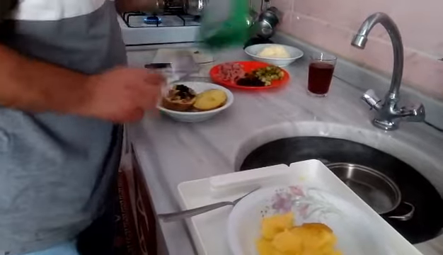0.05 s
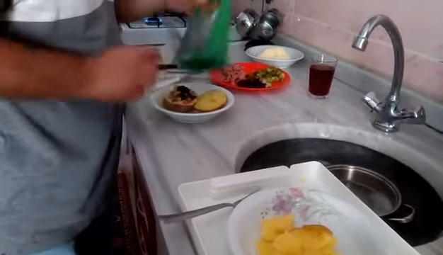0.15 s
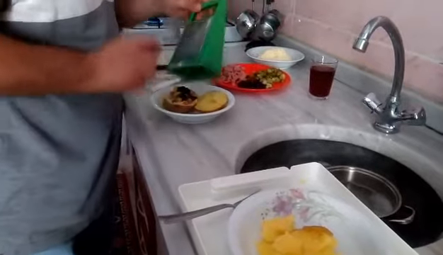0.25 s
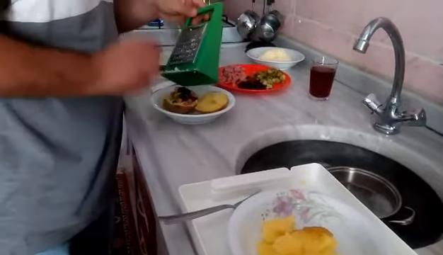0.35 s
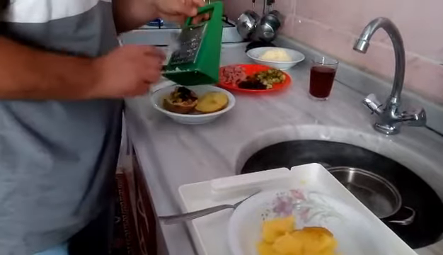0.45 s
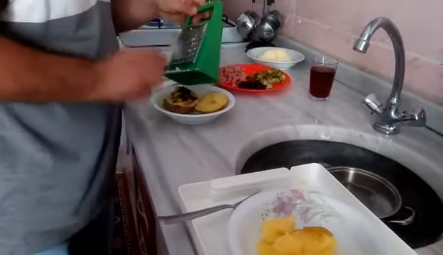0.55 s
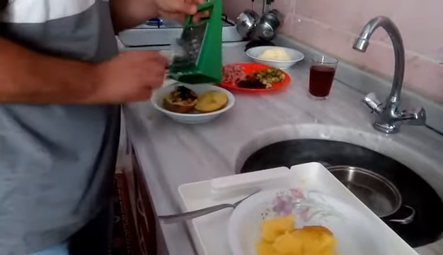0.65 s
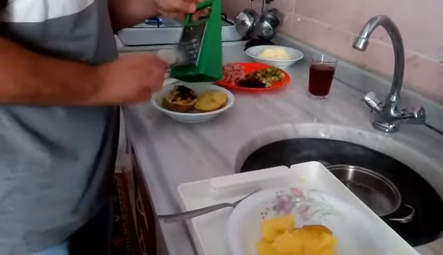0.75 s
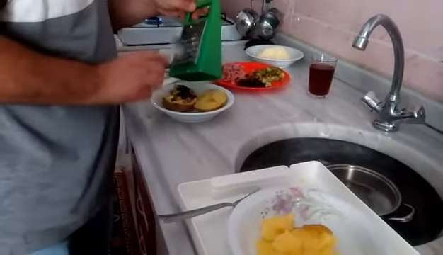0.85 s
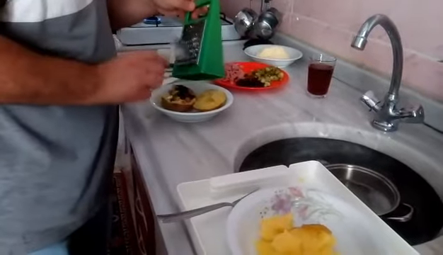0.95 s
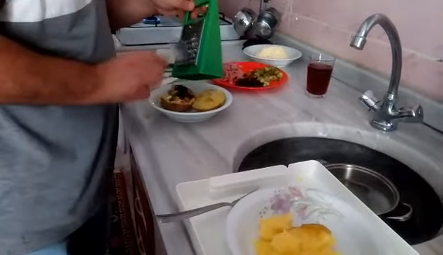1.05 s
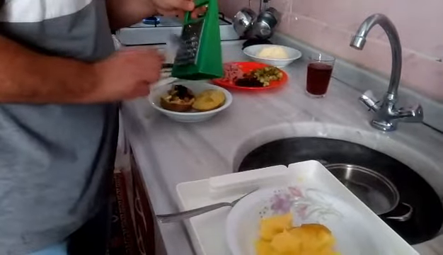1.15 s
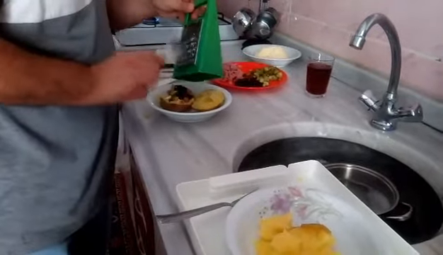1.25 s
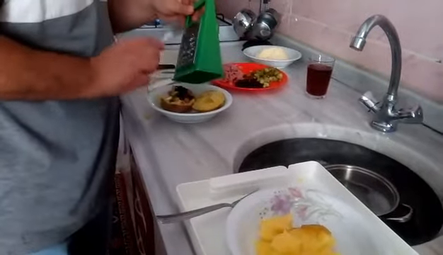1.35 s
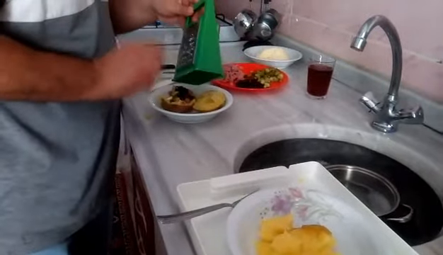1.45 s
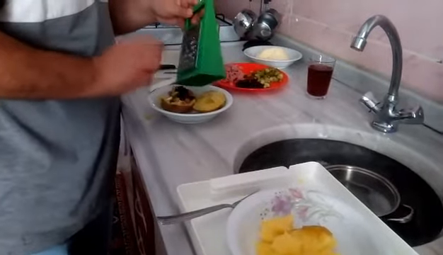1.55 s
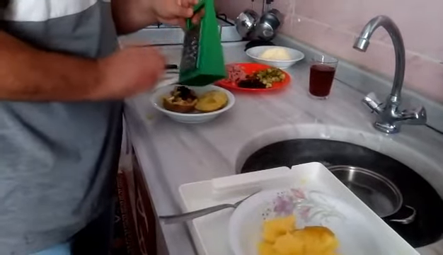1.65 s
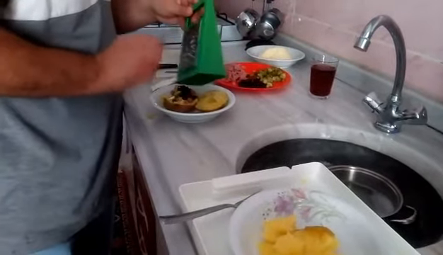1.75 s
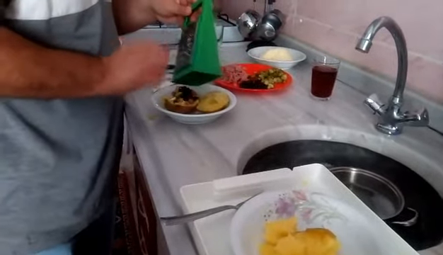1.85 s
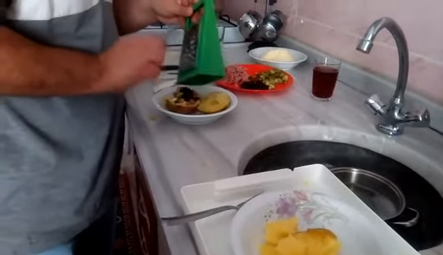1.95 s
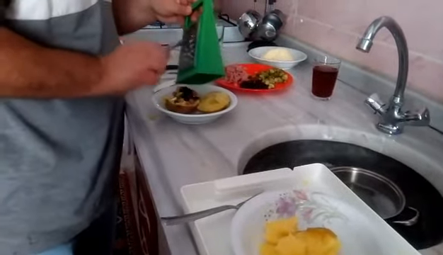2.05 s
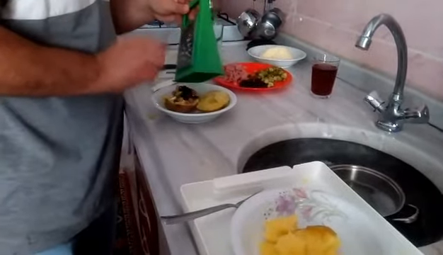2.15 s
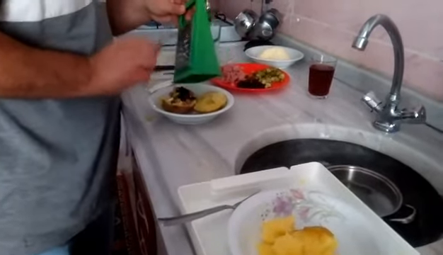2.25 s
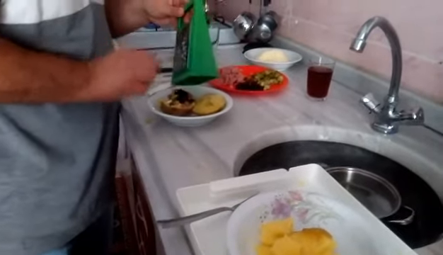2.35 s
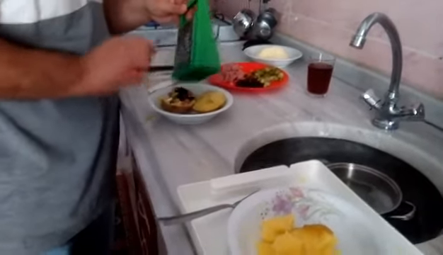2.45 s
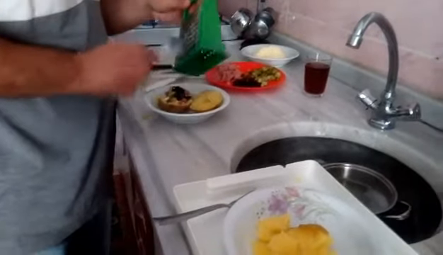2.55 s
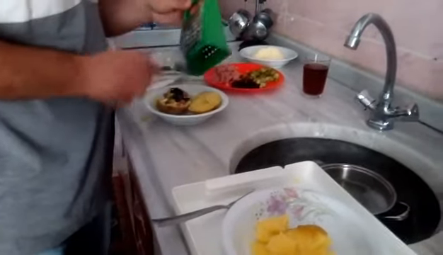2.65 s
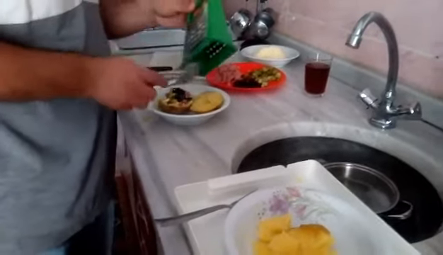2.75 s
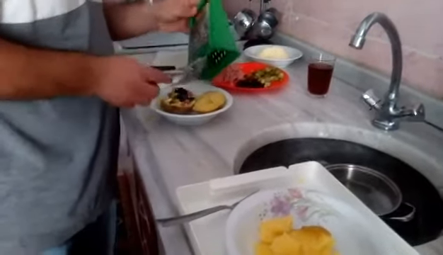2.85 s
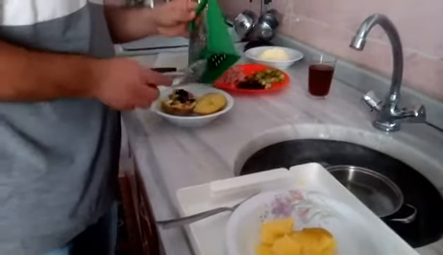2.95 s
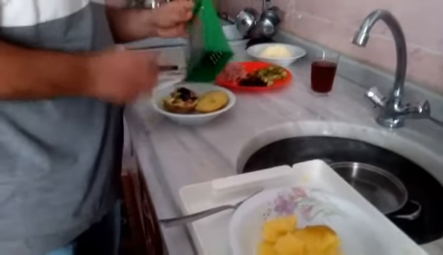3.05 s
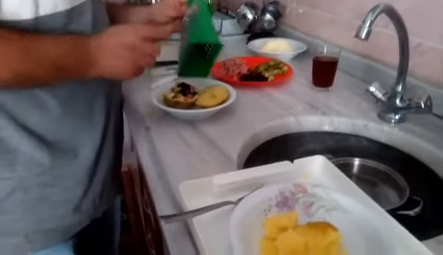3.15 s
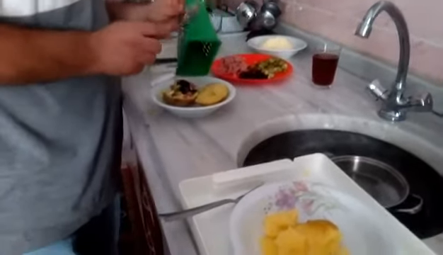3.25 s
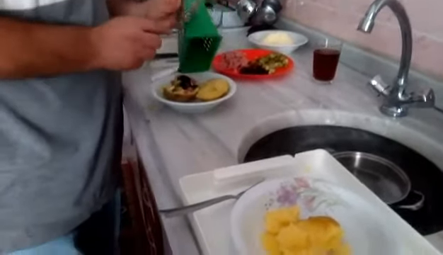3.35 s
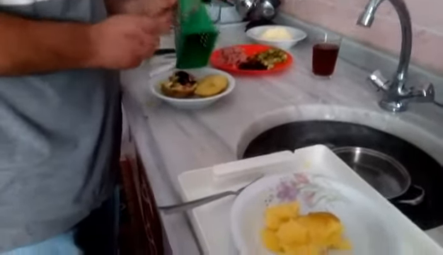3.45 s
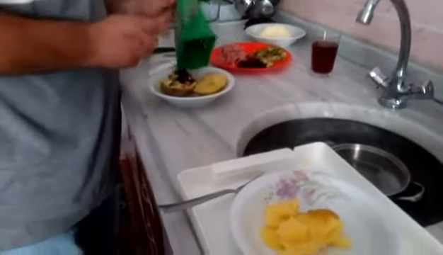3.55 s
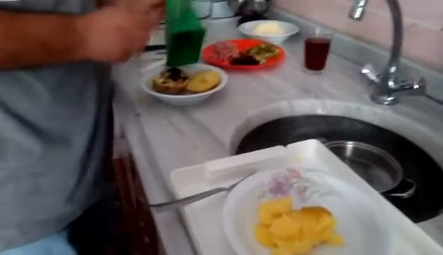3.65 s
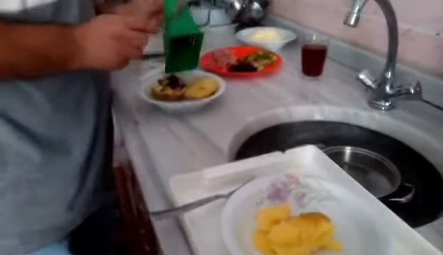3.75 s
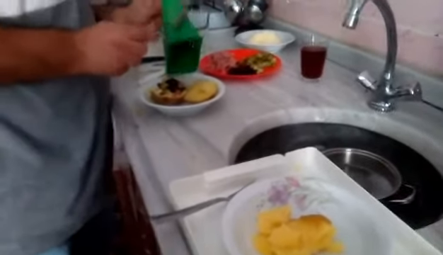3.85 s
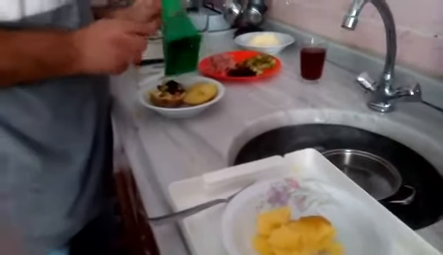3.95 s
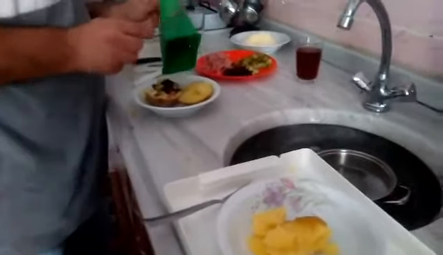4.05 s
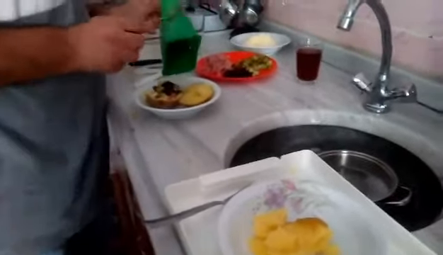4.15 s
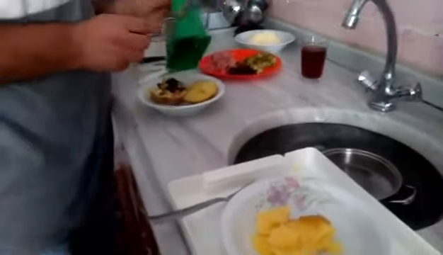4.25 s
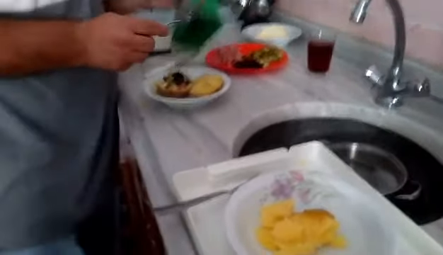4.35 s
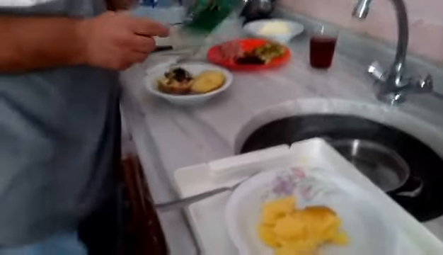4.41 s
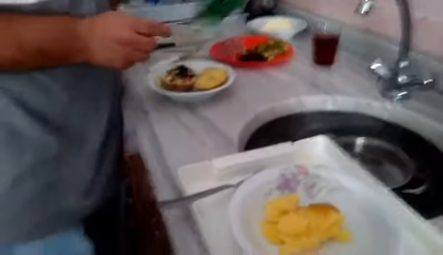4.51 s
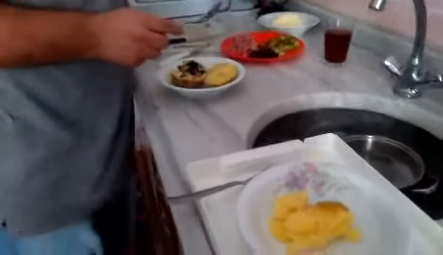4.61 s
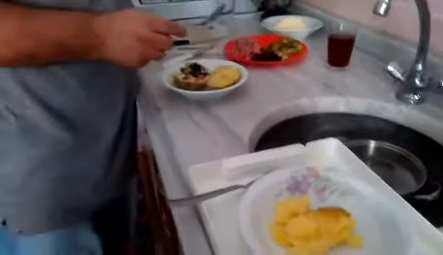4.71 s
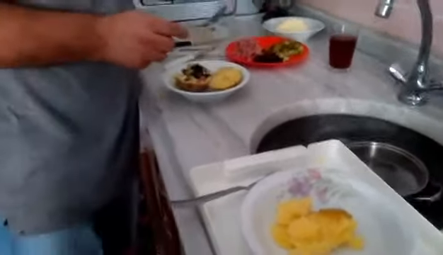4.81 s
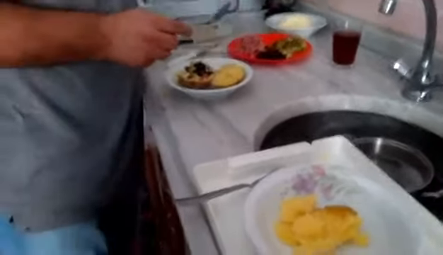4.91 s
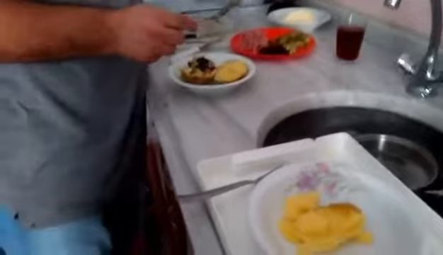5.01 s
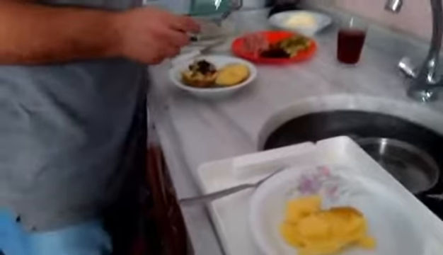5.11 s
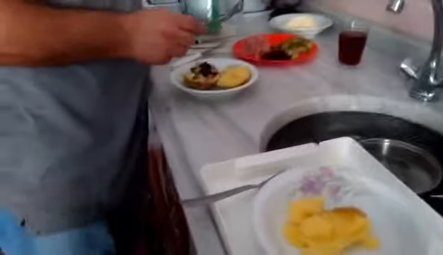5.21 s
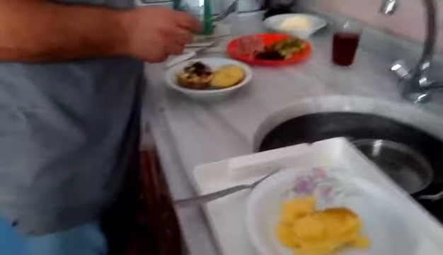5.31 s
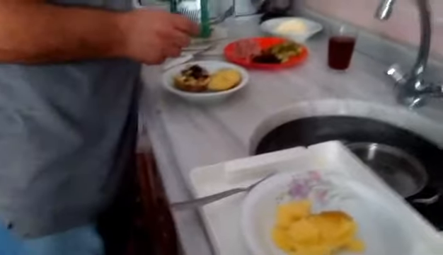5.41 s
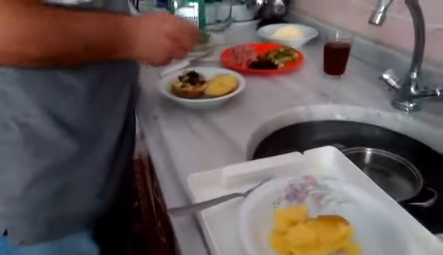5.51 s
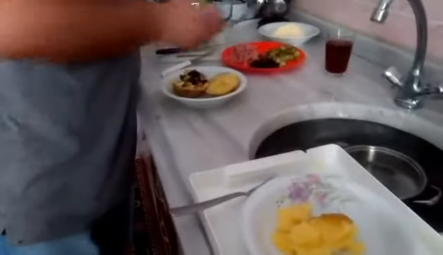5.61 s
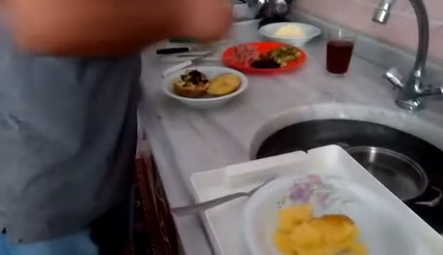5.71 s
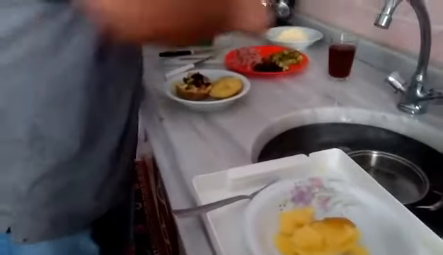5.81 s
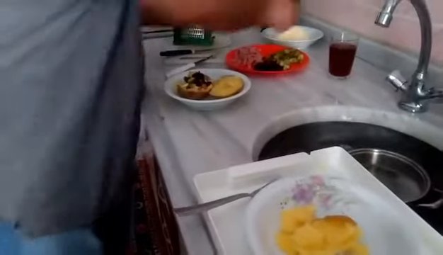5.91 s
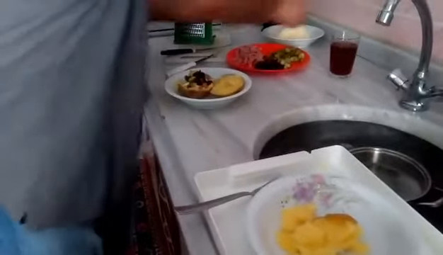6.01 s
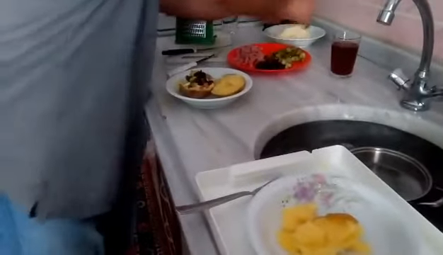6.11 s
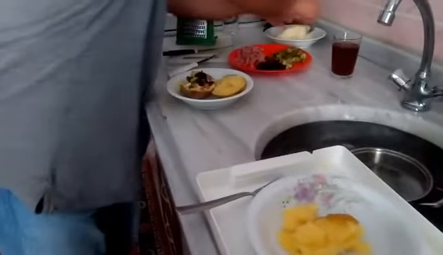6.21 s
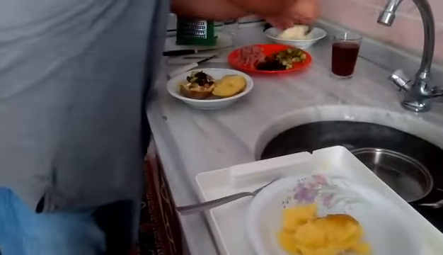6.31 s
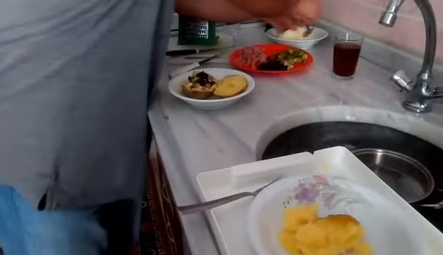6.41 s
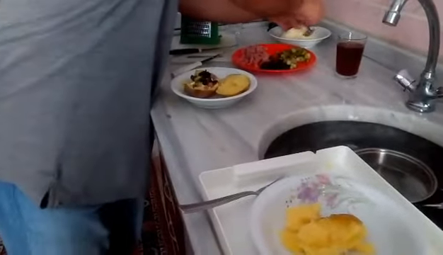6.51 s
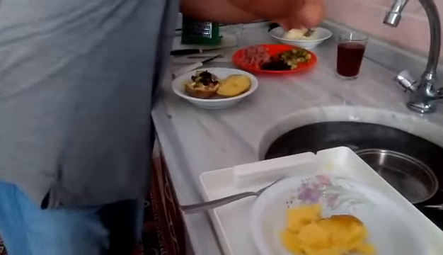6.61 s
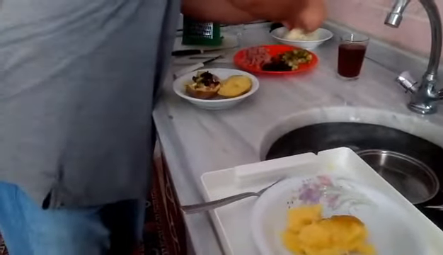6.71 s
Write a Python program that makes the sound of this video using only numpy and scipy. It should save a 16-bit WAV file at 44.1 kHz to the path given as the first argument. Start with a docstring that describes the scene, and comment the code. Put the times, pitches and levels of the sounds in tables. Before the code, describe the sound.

A knife taps a steel box grater with a plastic frame, close to the microphone in a small tiled kitchen. Two quick runs of six taps come almost back to back; after a pause of about a second, four louder taps follow. Each is a bright, hollow metallic clash with a short ring off the tiles. A few faint knocks and a clink come afterwards, while a refrigerator hums quietly behind.

```python
"""A box grater, steel sheets in a plastic frame, is tapped with a knife to shake the cheese off.
One microphone, close by in a small tiled kitchen, hears three quick runs of taps. Each blow sets off
a short clash, rings the sheets, hollow box, blade and frame, and comes back off the tiles.
A few light touches, knocks and clinks fall around the runs; a refrigerator hums behind."""
import sys
import numpy as np
from scipy import signal
from scipy.fft import rfft, irfft
from scipy.io import wavfile
from scipy.ndimage import uniform_filter1d, minimum_filter1d

SR = 44100
rng = np.random.default_rng(int(sys.argv[2]) if len(sys.argv) > 2 else 0)


def waveform_to_disk(signal):
    """Save audio, clipped to [-1, 1], as 16-bit WAV at the path in sys.argv[1]."""
    frames = np.transpose(np.atleast_2d(signal))
    scaled = np.clip(frames, -1, 1) * 32767
    samples = np.round(scaled).astype(np.int16)
    wavfile.write(sys.argv[1], SR, samples)


N = 298557
AGE = np.arange(int(.7 * SR)) / SR   # seconds since a blow


def grater_taps():
    """Knife on grater, close up: a dense clash, clearer modes and the room all grow with the force."""
    # Each row: start in seconds, force in dB, ring of the sheets in dB relative to the force.
    blows = [(0.461, -12.5, -13), (0.618, -14.5, -10.5), (0.773, -12, -9), (0.928, -8.5, -9),
             (1.084, -14, -12.5), (1.246, -11, -11.5), (1.528, -9.5, -12), (1.691, -10, -10),
             (1.91, -11.5, -22), (2.079, -11, -38), (2.23, -11, -9.5), (2.387, -10.5, -10.5),
             (3.408, -42, -1), (3.543, -8, -7.5), (3.723, -7.5, -6), (3.879, -9.5, -4), (4.045, -7.5, -4),
             (5.365, -37, -5), (5.383, -32, -15)]
    # The crowd of short-lived modes in a clash. Each row: frequency in Hz, relative density in dB.
    clash_colour = [(50, -75), (110, -40), (180, -17.5), (300, -24), (540, -13), (850, -14), (1100, -4.5),
                    (2100, -9.5), (2500, -3), (3400, -4), (4300, 0), (6300, 1.5), (7100, -4), (8300, -17),
                    (13500, -26), (15200, -20.5)]
    alike, body_send_db = 0.24, -9.5   # the clear modes reach the room more weakly than the clash
    out = np.zeros(N)
    common = noise(clash_colour, len(AGE))   # the share of the clash that is alike in every tap
    contact = 1 - np.exp(-AGE / 0.00073)   # rise of a blow
    for s, force_db, sheet_db in blows:
        hollow_db, blade_hz, blade_db, zing_hz, zing_db, frame_hz, room_db = grip_at(s)
        crowd = np.sqrt(alike) * common + np.sqrt(1 - alike) * noise(clash_colour, len(AGE))
        zing = from_db(zing_db) * cluster(zing_hz, spread=0.094, t60=0.04, count=24)
        clash = from_db(force_db) * (soften(crowd, force_db) * fade(t60=0.071) + zing)
        sheets = from_db(sheet_db) * steel_sheets()
        blade = from_db(blade_db) * cluster(blade_hz, spread=0.0684, t60=0.09, count=6)
        frame_gain = from_db(-27.5) * (frame_hz / 320) ** 2   # low modes radiate poorly
        frame = frame_gain * cluster(frame_hz, spread=0.051, t60=0.15, count=2)
        body = hollow_box(force_db, hollow_db) + from_db(force_db) * (sheets + blade + frame)
        room = from_db(room_db) * kitchen(clash + from_db(body_send_db) * body, build_s=0.0036)
        add(out, s, (clash + body) * contact + room)
    return out


def grip_at(s):
    """The grater is held anew for each run and for setting it down, and each grip rings differently."""
    # Each row: start in seconds, hollow in dB at an ordinary tap, blade in Hz and dB, zing in Hz and dB,
    # frame in Hz, room in dB. Blade, zing and room levels are relative to the force.
    grips = [(0, -21.5, 2100, -5, 6140, -1.5, 318, -6.5), (1.45, -23.5, 1980, -10, 5960, -5.5, 329, -4.5),
             (3, -19.5, 1867, -11.5, 6090, -4.5, 209, -5), (5, -22, 2060, -25, 6130, -7, 337, -5)]
    return [grip[1:] for grip in grips if grip[0] <= s][-1]


def steel_sheets():
    """The struck sheets ring in close, rattling modes."""
    # Each row: mode frequency in Hz, relative level in dB.
    modes = [(1393, -1), (1464, -2), (1513, 0), (1557, -5), (1621, 0), (1696, -4), (1859, -9), (2019, -9),
             (2220, -12), (2554, -12), (2907, -14), (4010, -13), (4220, -13), (6074, -7)]
    return ring(modes, t60=0.17, detune=0.0025, scatter_db=3.5, rattle=1.0, bend=0.021, settle_s=0.0059)


def hollow_box(force_db, grip_db):
    """The hollow of the box: its air takes a moment to get going."""
    # Each row: mode frequency in Hz, relative level in dB.
    modes = [(945, 7), (990, -0.5), (1150, 7.5), (1245, 0)]
    ordinary_db, follows = -7.5, 0.58   # under 1 dB per dB of force, so light touches sound hollower
    level_db = grip_db + follows * (force_db - ordinary_db)
    swell = 1 - np.exp(-AGE / 0.003)
    tone = ring(modes, t60=0.17, detune=0.011, scatter_db=3.5, rattle=1.0, bend=0.179, settle_s=0.01514)
    return from_db(level_db) * tone * swell


def ring(modes, t60, detune, scatter_db, rattle, bend, settle_s):
    """Struck modes start sharp, settle and rattle; the grip varies pitch and strength at each blow."""
    hz, db = np.transpose(modes)
    shift, strength, phase = rng.standard_normal((3, len(hz)))
    gains = from_db(db - db.max() + scatter_db * strength)
    shake = np.array([drift(55, size=len(AGE)) for mode in modes])
    bent_age = AGE + bend * settle_s * (1 - np.exp(-AGE / settle_s))   # stiffer while the knife presses
    cycles = np.outer(hz * (1 + detune * shift), bent_age) + phase[:, None]
    waves = np.sin(2 * np.pi * cycles + rattle * shake)
    damping = fade(t60 * (hz[0] / hz)[:, None] ** 0.4) / fade(t60)   # higher modes die sooner
    return unit_blow(gains @ (waves * damping), t60)


def cluster(hz, spread, t60, count):
    """A bunch of close modes that beat against each other."""
    places = np.linspace(-1, 1, count) + rng.uniform(-1.19, 1, count) / count
    waves = np.sin(2 * np.pi * (np.outer(hz * (1 + spread * places), AGE) + rng.random((count, 1))))
    return unit_blow(np.exp(-places ** 2) @ waves, t60)


def soften(sound, force_db):
    """A light touch stays in contact longer, so it has less treble."""
    edge_hz = np.clip(17000 * from_db(0.5 * (force_db + 22.0)), 2000, .45 * SR)
    return signal.sosfilt(signal.butter(2, edge_hz, fs=SR, output="sos"), sound)


def knocks():
    """Things handled near the microphone: dry ticks over dull thuds, and faint clinks of the knife."""
    # Each row: start in seconds, tick level in dB, thud level in dB.
    bumps = [(0.08, -32.5, -39.5), (0.918, -12, -48), (5.369, -55, -35.5), (6.281, -43, -35.5)]
    # The colours of tick and thud. Each row: frequency in Hz, relative density in dB.
    tick_colour = [(700, 3), (1500, -5), (2400, -12), (3100, 2), (4000, -4), (7000, -6), (10000, -34),
                   (15000, -27)]
    thud_colour = [(120, -23), (260, 3.5), (520, 5.5), (800, -6), (1300, -10), (3000, -26), (8000, -45),
                   (14000, -58)]
    # Each row: start in seconds, pitch in Hz, level in dB.
    clinks = [(0.079, 3200, -52), (5.536, 4250, -51)]
    out = np.zeros(N)
    for s, tick_db, thud_db in bumps:
        add(out, s, from_db(tick_db) * soften(noise(tick_colour, len(AGE)), tick_db) * fade(t60=0.0052))
        add(out, s, from_db(thud_db) * noise(thud_colour, len(AGE)) * fade(t60=0.042))
    for s, hz, db in clinks:
        add(out, s, from_db(db) * cluster(hz, spread=0.05, t60=.08, count=5))
    return out


def kitchen(sound, build_s):
    """Reflections off tiles and counter thicken and die away; the moving hand gives each tap its own."""
    # Each row: frequency in Hz, reverberation time in seconds, colour in dB.
    reverberation = [(199, 0.43, 0.5), (650, 0.38, 6.5), (1140, 0.42, 2), (1620, 0.4, 6.5),
                     (3150, 0.31, 1.5), (5960, 0.29, 1), (12200, 0.24, -2.5)]
    hz, t60, colour_db = np.transpose(reverberation)
    spectrum = rfft(noise(np.transpose([hz, colour_db]), len(AGE)))
    octave = np.round(np.log2(np.maximum(np.fft.rfftfreq(len(AGE), 1 / SR), 200) / 200))
    response = np.zeros(len(AGE))
    for k in np.unique(octave):
        band_t60 = at_hz(np.transpose([hz, t60]), 200 * 2 ** k)
        response += irfft(spectrum * (octave == k), len(AGE)) * fade(band_t60)
    response *= 1 - np.exp(-(AGE / build_s) ** 2)
    return signal.fftconvolve(sound, response / np.linalg.norm(response))[:len(AGE)]


def refrigerator(wander_s, flutter_db, mains_hz, mains_db):
    """Further back, a compressor turns a little unevenly and beats against the mains hum."""
    # Each row: frequency in Hz, rms level in dB.
    partials = [(96.9, -55.5), (242.2, -71), (290.7, -68), (339.1, -59.5), (387.6, -56.5), (441.4, -71),
                (538.3, -67), (586.8, -77)]
    t = np.arange(N) / SR
    turning = t + wander_s * drift(2.94)
    motor = np.zeros(N)
    for hz, db in partials:
        motor += from_db(db + flutter_db * drift(12)) * np.sin(2 * np.pi * (hz * turning + rng.random()))
    return np.sqrt(2) * (motor + from_db(mains_db) * np.sin(2 * np.pi * mains_hz * t))


def room_tone(level_db):
    """The steady air of the kitchen."""
    # Each row: frequency in Hz, relative density in dB.
    air_colour = [(30, -13), (48, 5.5), (65, 2), (110, 7), (200, 1), (370, 2.5), (600, -3.5), (1000, -7),
                  (3500, -12), (6500, -9), (8200, -27.5), (13800, -33), (15200, -21), (16000, -40)]
    return from_db(level_db) * noise(air_colour, N)


def limiter(x, threshold_db, squeeze, release_db_per_s, ahead_s):
    """The gain ducks just ahead of each loud burst and recovers steadily."""
    level_db = 10 * np.log10(np.abs(uniform_filter1d(x ** 2, size=256)) + 1e-12)
    cut_db = squeeze * np.maximum(level_db - threshold_db, 0)
    ahead = int(ahead_s * SR)
    early_cut_db = -minimum_filter1d(-cut_db, 2 * ahead)
    recovery_db = release_db_per_s * np.arange(N) / SR
    held_db = np.maximum.accumulate(early_cut_db + recovery_db, axis=-1) - recovery_db
    return x * from_db(-uniform_filter1d(held_db, ahead))


def from_db(db):
    """Decibels to gain."""
    return 10 ** (np.asarray(db) / 20)


def at_hz(points, hz):
    """Read a table on a log-frequency axis."""
    known_hz, values = np.transpose(points)
    return np.interp(np.log(np.maximum(hz, 1)), np.log(known_hz), values)


def noise(colour, size):
    """Noise of a given colour, rms 1."""
    gains = from_db(at_hz(colour, np.fft.rfftfreq(size, 1 / SR)))
    wave = irfft(rfft(rng.standard_normal(size)) * gains, size)
    return wave / np.sqrt(np.mean(wave ** 2) + 1e-20)


def drift(rate_hz, size=N):
    """A smooth random wander, spread about 1."""
    steps = rng.standard_normal(1000)
    return np.interp(np.arange(size) / SR * rate_hz, np.arange(len(steps)), steps)


def fade(t60):
    """Free decay after a blow, 60 dB in t60 seconds."""
    return np.exp(-np.log(1000) * AGE / t60)


def unit_blow(wave, t60):
    """Let a wave die away, with the energy it would have if it began at rms 1."""
    envelope = fade(t60)
    return wave * envelope * np.linalg.norm(envelope) / np.linalg.norm(wave * envelope)


def add(track, s, sound):
    """Mix a sound in at s seconds."""
    start = int(s * SR)
    track[start:start + len(sound)] += sound[:N - start]


def scene():
    """At the microphone: taps and knocks in front, hum and room tone behind."""
    hum = refrigerator(wander_s=0.00049, flutter_db=1.8, mains_hz=99.6, mains_db=-65)
    background = hum + room_tone(level_db=-55)
    return (grater_taps() + knocks() + background)[None]


def record(dry):
    """The recorder holds loud bursts down, rounds the remaining peaks and cuts the highest treble."""
    limited = limiter(dry, threshold_db=-18, squeeze=0.38, release_db_per_s=118, ahead_s=0.02)
    lowpass = signal.ellip(10, .3, 70, 15800, fs=SR, output="sos")
    return signal.sosfilt(lowpass, np.tanh(limited))


dry = scene()
out = record(dry)
waveform_to_disk(out)
```